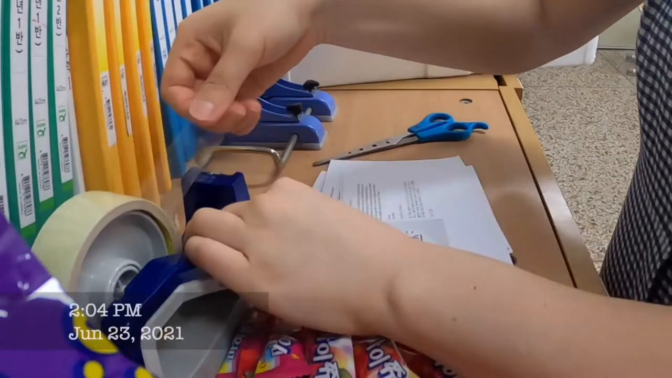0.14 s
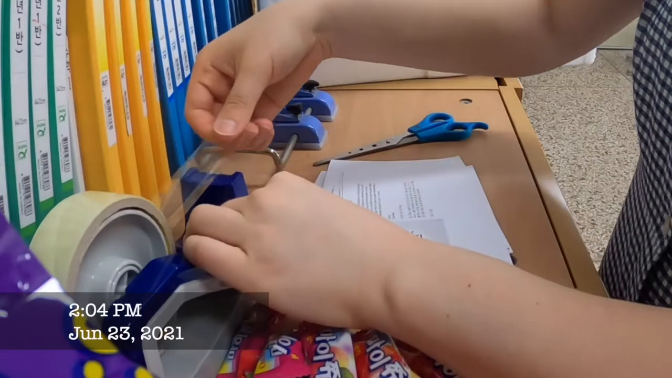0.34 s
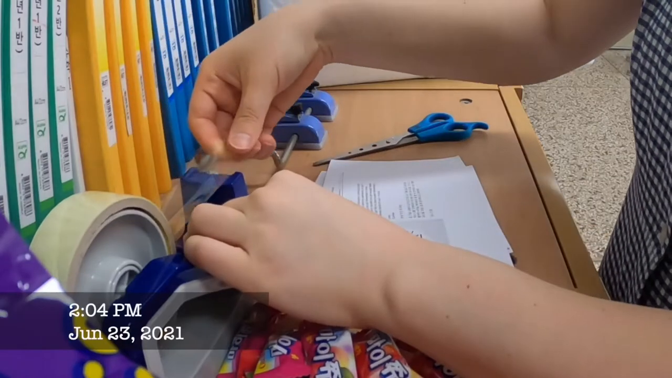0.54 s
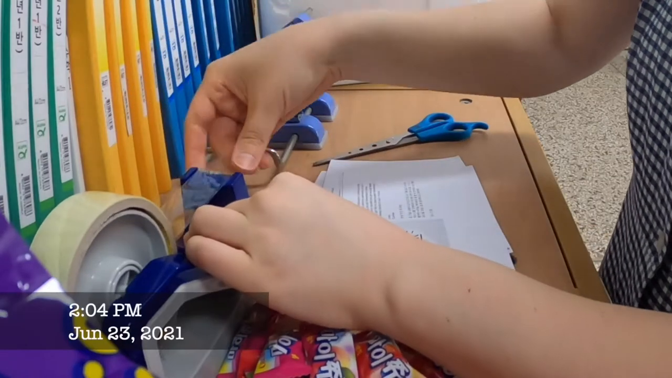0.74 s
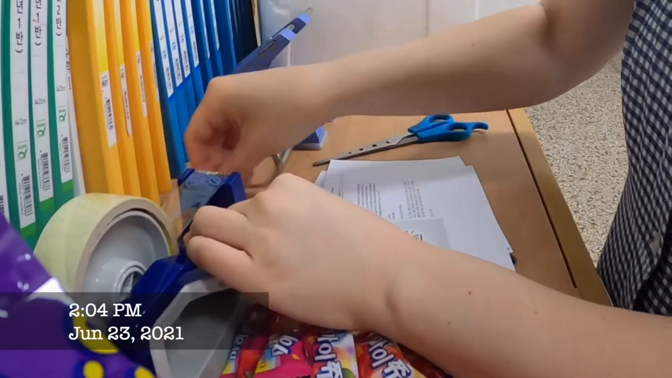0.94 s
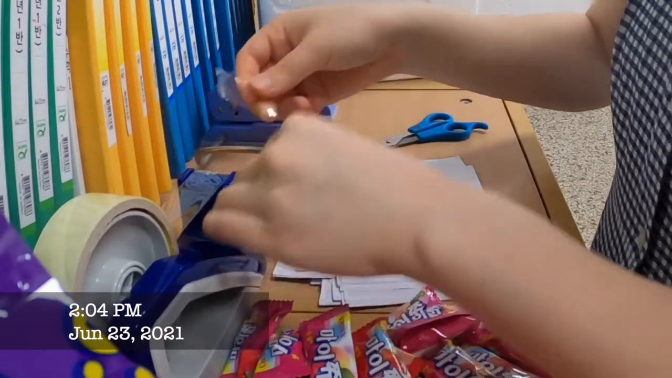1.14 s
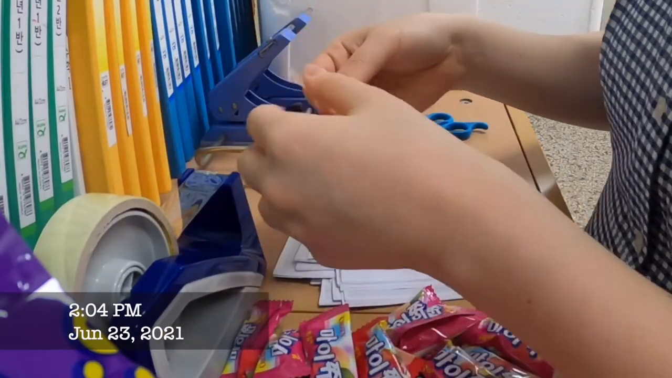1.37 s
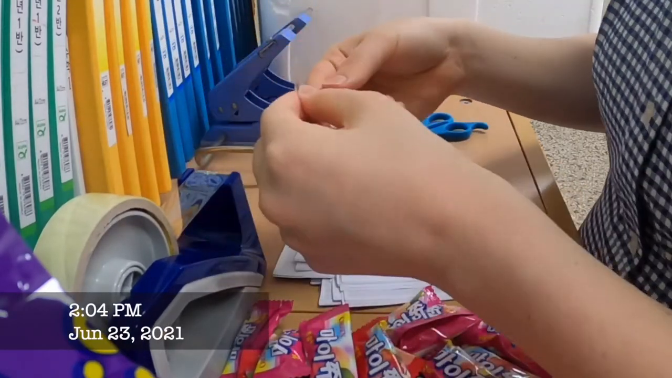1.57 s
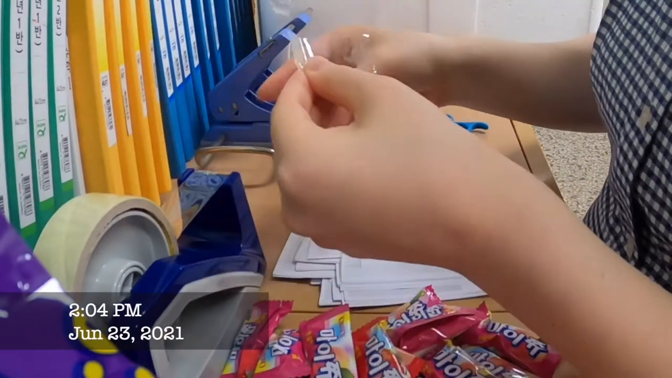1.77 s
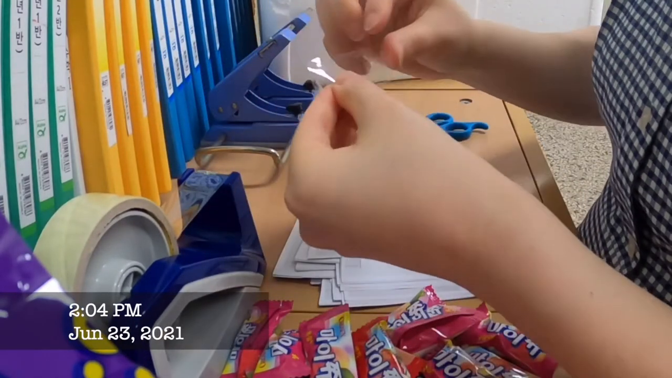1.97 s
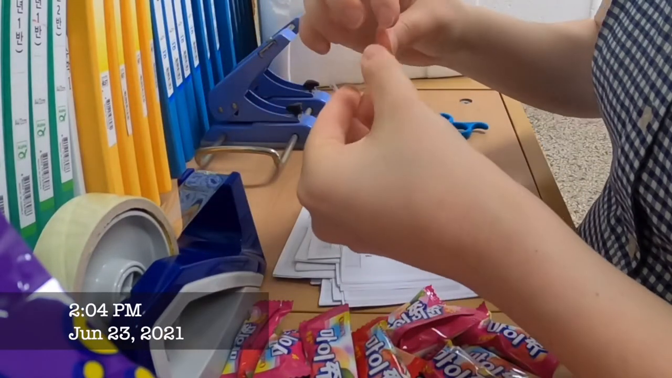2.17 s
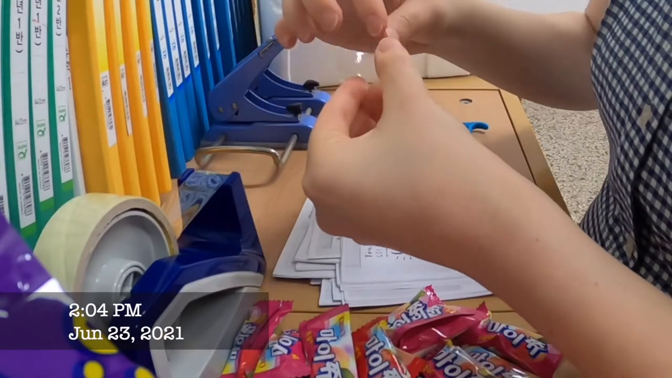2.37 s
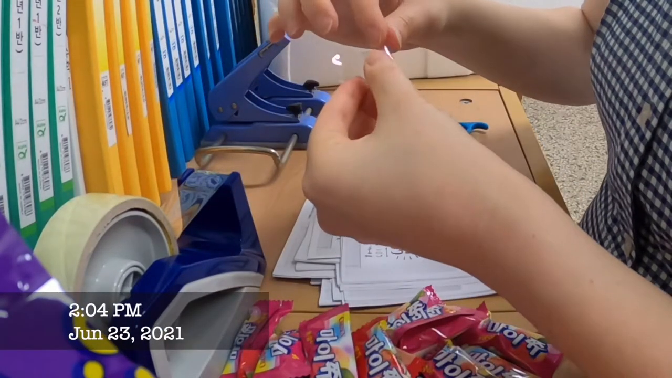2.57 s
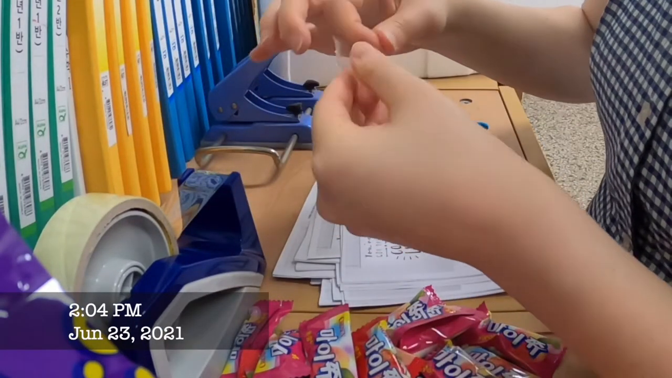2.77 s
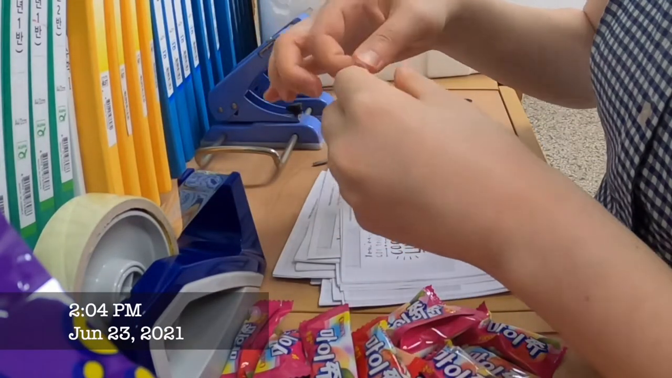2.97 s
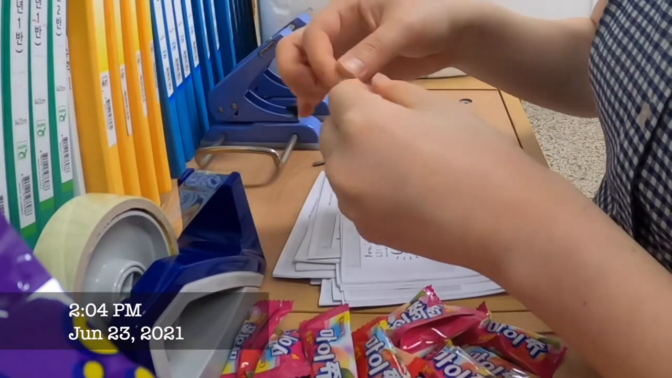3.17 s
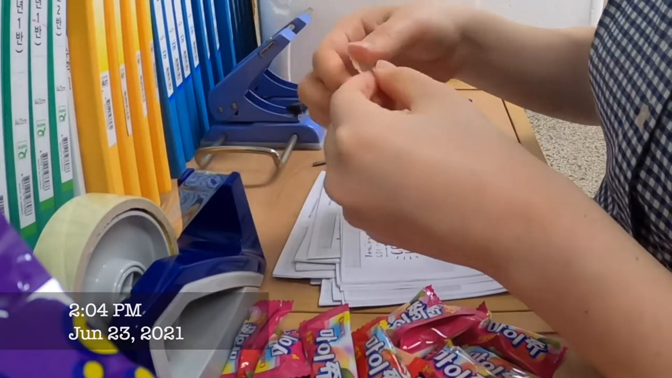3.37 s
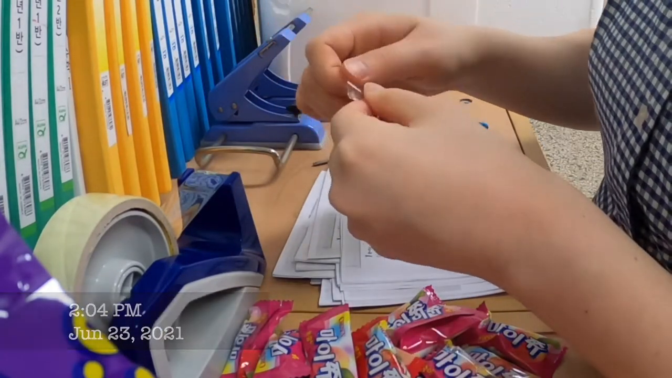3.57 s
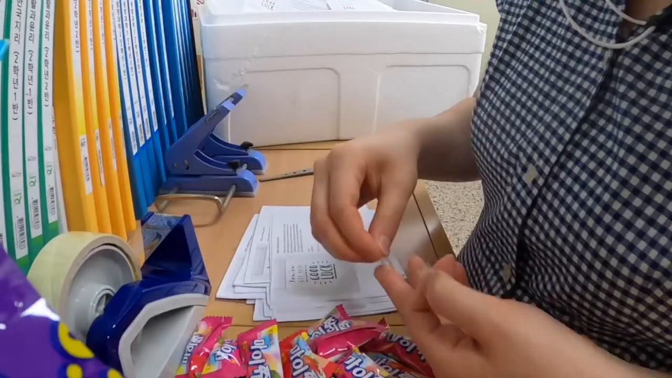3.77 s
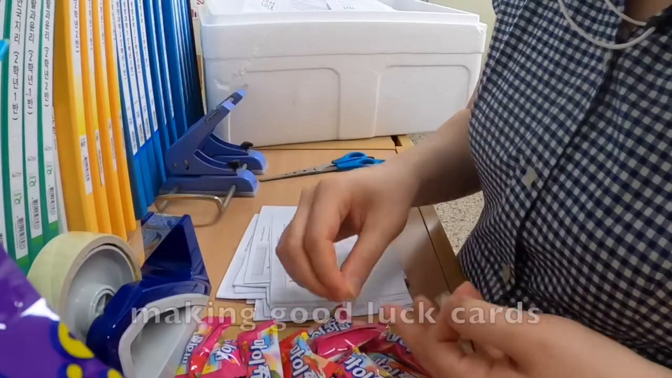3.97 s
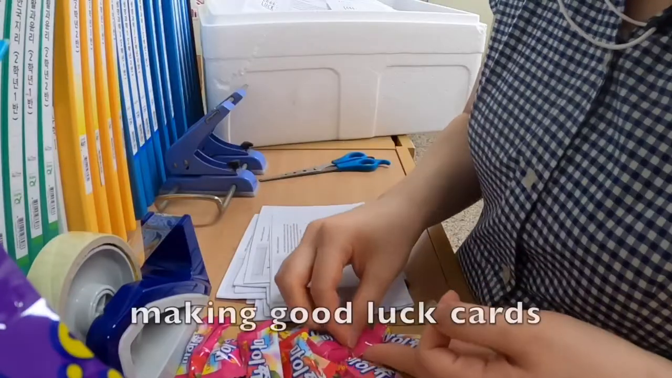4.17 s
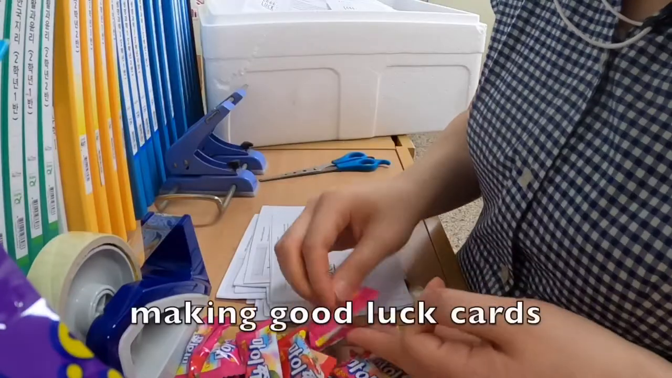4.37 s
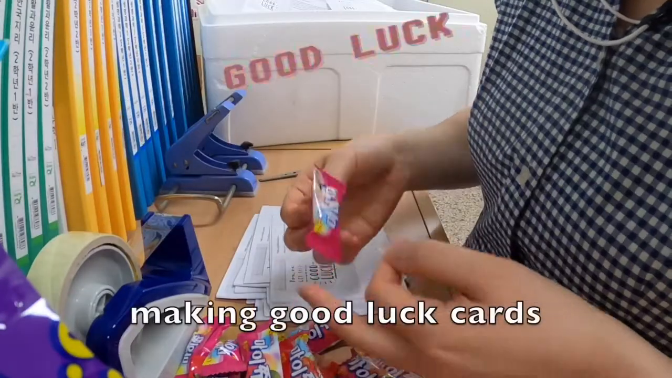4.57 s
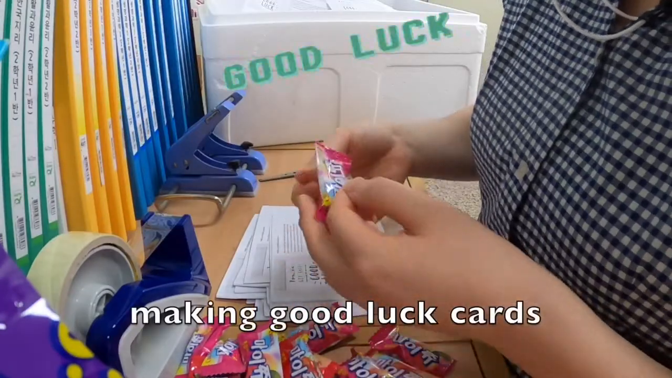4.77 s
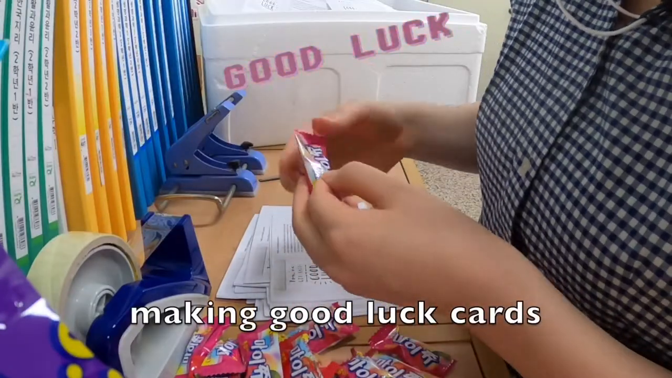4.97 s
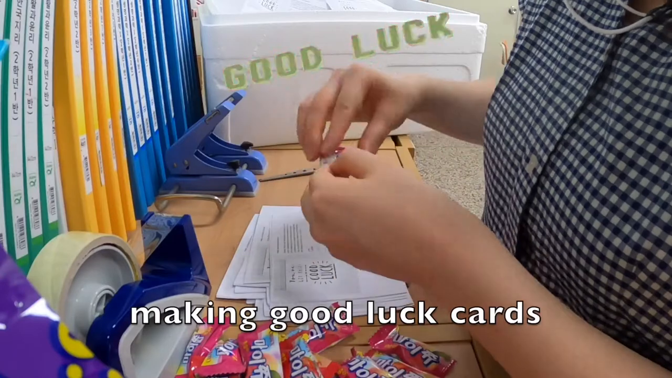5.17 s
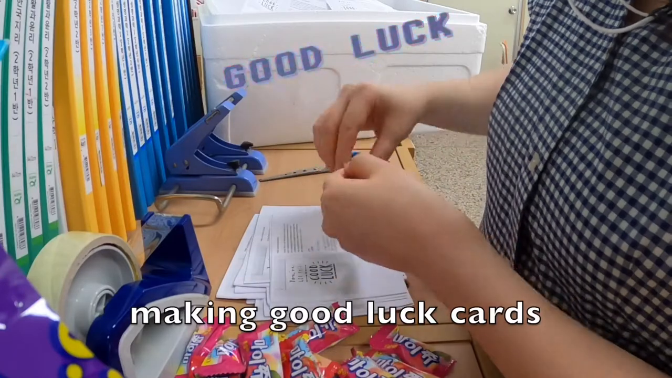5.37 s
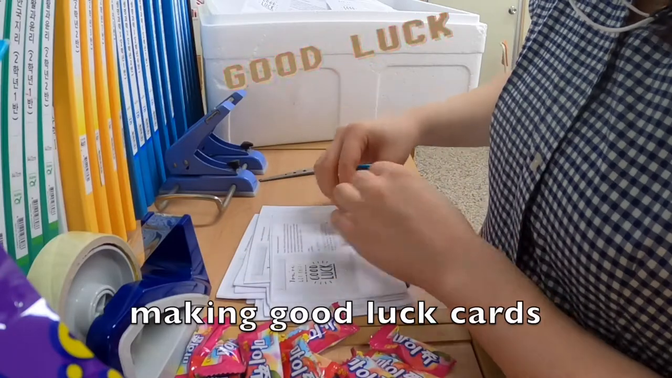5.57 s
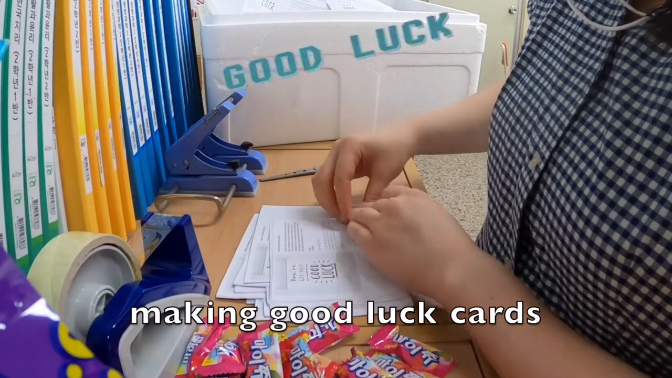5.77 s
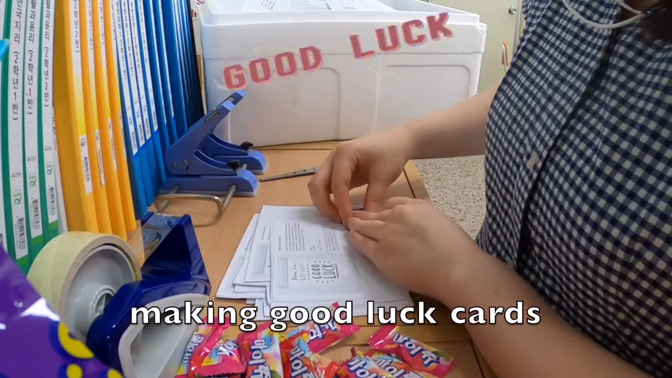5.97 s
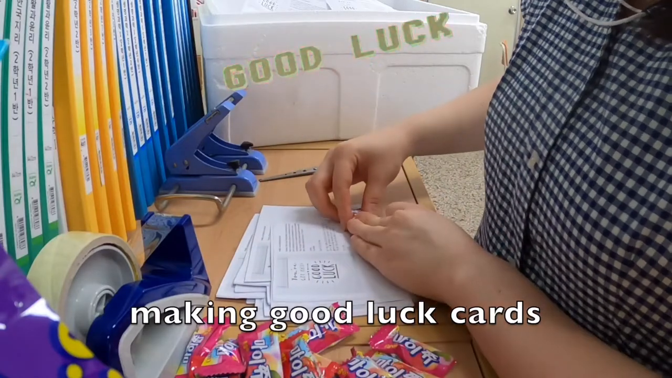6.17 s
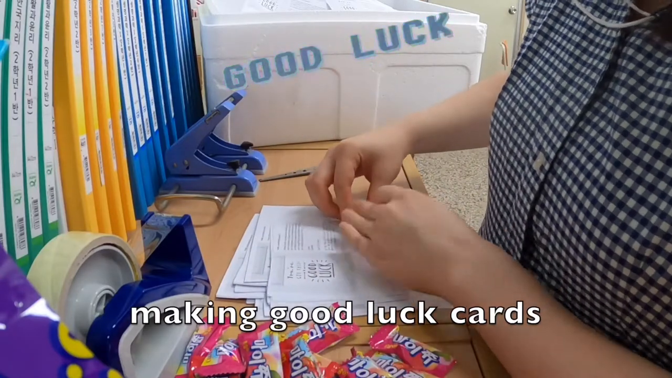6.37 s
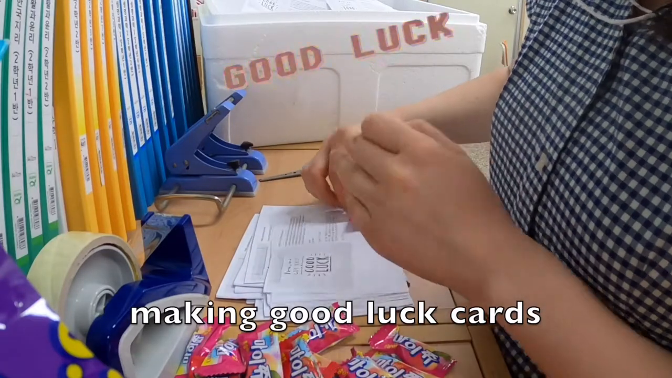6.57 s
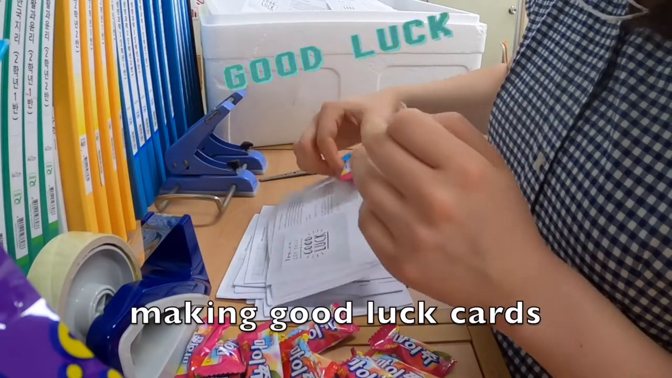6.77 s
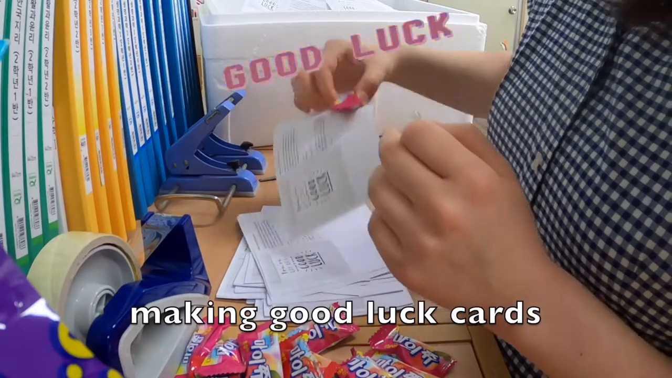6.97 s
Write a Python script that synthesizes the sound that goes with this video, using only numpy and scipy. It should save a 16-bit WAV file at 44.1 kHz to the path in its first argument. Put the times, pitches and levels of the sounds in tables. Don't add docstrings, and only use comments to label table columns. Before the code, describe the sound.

A small office with steady, bass-heavy ventilation hum, heard closely in stereo with a short room tail. From 0 to 0.4 seconds sticky tape is pulled from a desk dispenser: sharp glue snaps, a fast ratcheting rip around 0.16 to 0.28 that slows slightly, and hollow low thumps and plastic rattles as the dispenser jolts. Near 0.7 to 0.85 come small ticks and light knocks, then at 0.94 a loud snap and hollow thump as the tape tears. Mostly hum follows, with delicate clicks at 1.5 to 1.75 and sparse faint ticks and soft skin rubs until 3.7. At 4.1 a sweet wrapper is grabbed in a dense bright crackle, thinning by 4.8. Lighter crinkles come at 5.2 to 5.45, crisper ones around 5.8, then pressing crackles at 6.0 and 6.4, a few last ticks near 6.7 and a soft stroke on card at 6.9.

```python
import sys
import numpy as np
from scipy import signal
from scipy.fft import rfft, irfft
from scipy.io import wavfile
from scipy.ndimage import uniform_filter1d

SR = 44100
rng = np.random.default_rng(int(sys.argv[2]) if len(sys.argv) > 2 else 0)


def int16_out(signal):
    q = np.round(np.clip(np.atleast_2d(signal).T, -1, 1) * 32767)
    wavfile.write(sys.argv[1], SR, q.astype(np.int16))


def linear_from_db(decibels):
    return 10 ** (np.asarray(decibels, float) / 20)


N = 309582
TIME_S = np.arange(N) / SR
HZ = np.fft.rfftfreq(N, 1 / SR)

# frequency [Hz], level [dB per Hz].
OFFICE_SPECTRUM = [(12, -51.5), (20, -17.5), (48, -8), (113, -3), (146, -11.5), (187, -8.5), (285, -19.5),
                   (472, -22.5), (624, -30), (678, -28), (1090, -28), (2080, -39), (4420, -52.5),
                   (4810, -44.5), (16000, -77)]
OFFICE_DB = -52
# centre frequency [Hz], width [Hz], level [dB].
HUM_AND_HISS = [(58, 3.3, -60), (119.5, 10, -63), (172, 14, -72), (415.3, 7.1, -78.5), (4800, 60, -93.5),
                (7000, 4700, -85.5)]
# frequency [Hz], gain [dB].
ROOM_COLOUR = [(100, -0.5), (400, -6.5), (1500, -4), (5000, -0.5), (9000, -5), (16000, -15)]
ROOM_T60_S, ROOM_DB = 0.36, -10.5

# frequency [Hz], level [dB per Hz].
FILM_SPECTRUM = [(160, -46), (280, -14), (592, -7.5), (764, -13), (936, -2), (1290, -1), (1670, -2.5),
                 (3300, -3), (7980, -11), (12000, -27.5), (16300, -36.5)]
# start [s], hold [s], level [dB], treble [dB].
TAPE_MOVES = [(.0, 0.058, -54, -7), (.158, 0.043, -33, -2), (.178, 0.087, -30.5, -0.5),
              (.69, 0.053, -59.5, -3.5), (.865, 0.044, -59, -8.5), (.938, 0.0073, -34.5, -10.5),
              (.99, 0.15, -61.5, -4), (1.52, 0.14, -66.5, -7), (1.64, 0.066, -60.5, 4),
              (1.73, 0.0054, -48.5, -0.5), (2.1, 0.01, -76, -6.5), (2.275, 0.013, -70, 1.5),
              (2.35, 0.014, -70.5, 6), (2.62, .13, -67, -2.5), (2.93, 0.096, -68, -7),
              (3.19, 0.094, -71, 8), (3.345, 0.14, -68, -6), (3.55, 0.091, -64.5, -19),
              (3.65, 0.026, -59, -10)]
# start [s], hold [s], level [dB], treble [dB].
WRAPPER_MOVES = [(4.12, 0.011, -48, -7), (4.133, 0.058, -38, -3.5), (4.2, 0.021, -50, -4),
                 (4.275, 0.074, -45.5, -6.5), (4.37, 0.054, -50.5, -5), (4.44, 0.056, -48, -9.5),
                 (4.565, 0.1, -57.5, -2.5), (4.758, 0.0093, -54.5, 0.8), (4.96, 0.061, -60.5, -4),
                 (5.02, 0.0081, -52, -2), (5.19, 0.087, -59, -3), (5.33, 0.13, -56.5, 1),
                 (5.715, 0.019, -56, -18), (5.785, 0.087, -51.5, -4.5), (6.0, .03, -51.5, -2),
                 (6.06, 0.34, -60.5, -13), (6.43, 0.075, -55, -3.5), (6.7, 0.1, -68, 1.5),
                 (6.89, 0.071, -59.5, -3)]
# release [s], settling [dB], settling time [s per neper], idle fingers [dB].
TAPE_FEEL = (0.0106, -15.5, 0.11, -76.5)
WRAPPER_FEEL = (0.0272, -22, 0.02, -66.5)
GRAB_S, ATTACK_S = 4.1, .004

# start [s], peak [dB], pitch [Hz], T60 [s], shell knock [dB].
JOLTS = [(.011, -33, 161, 0.16, -15), (0.07, -21, 153, 0.087, -8.5), (0.096, -31, 174, 0.089, 11),
         (.1905, -15, 169.7, 0.07, -22), (0.2183, -22, 195, .3, -10.5), (.282, -20.5, 173, 0.076, -17),
         (0.366, -15, 154.7, 0.068, -10), (0.732, -40.5, 144, 0.041, -4), (0.851, -47.5, 148, 0.22, -13),
         (0.94, -10, 179, 0.067, -4), (.9525, -36, 190, .03, -20), (0.9557, -20.5, 191.7, 0.13, -36),
         (4.989, -47, 364, 0.046, -22)]
# pitch ratio, level [dB], share of the jolt's T60.
BODY_MODES = [(1, 6, 1.1), (0.65, -19.5, 0.43), (1.27, -3.5, 1.2), (2.2, -3, 0.36), (1.5, 2, .45)]
# frequency [Hz], level [dB], T60 [s].
SHELL_MODES = [(737, -2, 0.04), (1140, -4, 0.015), (593, -3, 0.021), (970, -15, 0.0093), (1330, -5, 0.0062)]
# time [s], drumming [dB], rattle [dB over drumming].
ROLL_TURNING = [
    (.12, -46, -8),
    (.14, -34, 2),
    (.165, -28, -1),
    (.195, -27, .5),
    (.215, -26.5, -2),
    (.235, -25.5, -4),
    (.265, -28, -6),
    (.29, -33.5, -17),
]

# time [s], level [dB], strongest pitch [Hz], second pitch [Hz], treble [dB].
GLUE_SNAPS = [(0.0658, -21.0, 6310, 4610, -16), (0.0755, -43.0, 5750, 3190, -18),
              (0.0951, -24.5, 5810, 2670, -14), (0.1044, -40.0, 5710, 2370, -18),
              (0.1303, -22.5, 2650, 5770, -12), (0.1436, -23.0, 3940, 7620, -11),
              (0.154, -27.0, 7750, 1890, -12), (0.2723, -24.0, 4070, 2840, -15),
              (0.2901, -52.0, 6330, 4330, -4), (0.2979, -50.0, 3080, 6850, -16),
              (0.3028, -45.5, 2990, 1160, -7), (0.3282, -54.0, 2860, 3920, -9),
              (0.342, -47.5, 4440, 2650, -19), (0.3692, -39.5, 1340, 3010, -24),
              (0.7043, -53.5, 5880, 4050, -14), (0.7307, -38.0, 5250, 2690, -17),
              (0.8345, -55.0, 2560, 6520, -12), (0.8635, -58.5, 2350, 1700, -36),
              (0.8979, -55.0, 3920, 5470, -12), (0.925, -41.5, 1230, 3960, -13),
              (0.9357, -31.5, 2300, 1340, -18), (0.9399, -29.5, 1420, 2430, -20),
              (0.9441, -31.0, 2150, 1160, -27), (0.9477, -35.5, 2020, 1290, -27),
              (0.9514, -42.0, 3140, 1270, -21), (1.0828, -53.5, 1180, 1640, -25)]
FOLD_SNAPS = [(1.5121, -54.0, 1230, 2500, -21), (1.5376, -48.5, 2990, 1530, -18),
              (1.5734, -52.0, 2950, 1790, -12), (1.5978, -61.0, 1640, 1180, -27),
              (1.6016, -59.0, 1400, 1920, -30), (1.6582, -53.5, 1790, 4200, -13),
              (1.6701, -35.5, 4110, 1350, -6), (1.6954, -56.0, 7390, 3010, -6),
              (1.7317, -41, 3300, 6500, -9), (1.7339, -35.0, 5860, 8480, -5),
              (2.1078, -55.0, 2800, 7640, -8), (2.2816, -57.0, 2800, 1570, -16),
              (2.6056, -55.0, 6930, 5060, -8), (2.6533, -59.5, 2990, 1180, -32),
              (2.8375, -45.0, 1610, 2730, -26), (2.9273, -56.5, 3080, 5710, -17),
              (2.9536, -57.5, 1160, 3290, -16), (3.0188, -65.0, 1340, 1830, -33),
              (3.235, -46.5, 3450, 5020, -11), (3.243, -44.5, 4650, 2840, -12),
              (3.2527, -53.0, 3450, 4840, -24), (3.262, -48.5, 1290, 1770, -20),
              (3.3529, -57.5, 1720, 1210, -26), (3.3638, -54.5, 1740, 1180, -23),
              (3.3825, -58.0, 1440, 2130, -29), (3.4035, -59.0, 1250, 1870, -24),
              (3.4203, -59.0, 1790, 1140, -24), (3.4849, -66.0, 1530, 1100, -10),
              (3.49, -53.5, 4370, 2280, -11), (3.6949, -56.5, 7750, 5660, -2)]
GRAB_SNAPS = [(4.1078, -51.5, 1920, 7710, -14), (4.1342, -33.0, 5750, 3080, -15),
              (4.1384, -28.0, 4290, 1790, -27), (4.1479, -31.0, 5060, 7210, -14),
              (4.1549, -43.0, 2070, 3830, -16), (4.1577, -47.0, 4670, 2990, -15),
              (4.1602, -33.0, 2710, 1810, -20), (4.1648, -27.0, 2910, 1590, -13),
              (4.1674, -33.5, 1960, 4370, -19), (4.1708, -39.0, 3250, 4800, -19),
              (4.1761, -43.0, 3190, 1680, -5), (4.179, -34.0, 2910, 4050, -16),
              (4.1886, -27.0, 3320, 1980, -17), (4.1983, -35.5, 1790, 2540, -14),
              (4.2035, -49.5, 3230, 1530, -17), (4.2177, -40.0, 2200, 4050, -17),
              (4.2203, -40.0, 1680, 2780, -16), (4.225, -36.5, 2090, 4930, -7),
              (4.2726, -45.5, 2760, 1830, -12), (4.2795, -43.5, 4910, 2050, -7),
              (4.2843, -40.0, 4870, 3230, -12), (4.2942, -34.5, 4290, 2020, -15),
              (4.3034, -39.0, 2840, 4840, -15), (4.3079, -41.5, 1960, 2860, -27),
              (4.3114, -44.5, 4800, 1770, -14), (4.3176, -47.0, 3290, 4870, -15),
              (4.3295, -35.0, 3360, 2240, -23), (4.3358, -34.5, 5790, 2800, -11),
              (4.3444, -41.5, 2410, 4890, -19), (4.3496, -44.5, 4220, 1920, -16),
              (4.3542, -42.0, 3570, 1720, -27), (4.3587, -46.5, 4090, 1660, -4),
              (4.3656, -42.0, 2300, 4570, -11), (4.3829, -50.5, 4890, 1530, -11),
              (4.3944, -43.5, 4540, 2240, -21), (4.4095, -39.5, 7600, 4720, -11)]
LIFT_SNAPS = [(4.4279, -44.5, 3400, 2330, -23), (4.4373, -40.0, 3450, 2240, -16),
              (4.4528, -46.0, 4720, 3270, -17), (4.4595, -41.5, 1680, 5810, -16),
              (4.4694, -51.0, 2910, 1270, -12), (4.4933, -45.0, 6420, 3570, -7),
              (4.5032, -38.0, 3450, 1250, -22), (4.5193, -49.0, 2780, 1590, -17),
              (4.5573, -38.5, 4970, 3490, -20), (4.5654, -34.0, 4130, 2260, -18),
              (4.5764, -47.5, 3680, 5060, -7), (4.6052, -60.0, 3060, 4200, -16),
              (4.6126, -46.0, 2910, 4780, -11), (4.6174, -38.0, 4970, 2890, -18),
              (4.6277, -54.5, 2540, 5150, -15), (4.6441, -52.0, 3190, 2330, -14),
              (4.6508, -41.5, 9430, 5620, 1), (4.7572, -38.5, 7750, 3660, -5),
              (4.7628, -46.5, 2730, 5280, -16), (4.7738, -44.5, 5640, 3040, -15),
              (4.9053, -52.0, 5120, 2150, -8), (4.9165, -60.5, 2670, 4070, -23),
              (4.9579, -60.5, 2170, 1570, -16), (4.9705, -57.5, 2220, 1610, -14),
              (4.9766, -52.0, 4460, 1610, -12), (5.0371, -47.5, 7210, 2350, -4)]
STICK_SNAPS = [(5.2014, -58.0, 5020, 2840, -8), (5.2434, -49.0, 2820, 7040, -7),
               (5.3233, -46.5, 4390, 2760, -11), (5.3396, -53.0, 5470, 1140, -27),
               (5.3453, -51.0, 1230, 5320, -15), (5.3717, -45.0, 3340, 5060, -5),
               (5.3805, -39.0, 2800, 1850, -31), (5.3995, -42.0, 4590, 2690, -4),
               (5.4182, -45.0, 6010, 3380, -5), (5.4229, -45.5, 4820, 7320, -9),
               (5.4418, -39.5, 3340, 5080, -5), (5.558, -53.5, 1890, 1100, -21),
               (5.6299, -52.5, 2390, 3600, -29), (5.7078, -49.5, 4090, 2930, -6),
               (5.7185, -47.0, 2200, 3400, -9), (5.7389, -49.5, 1210, 4590, -15),
               (5.7672, -51.0, 4410, 1790, -20), (5.7721, -50.5, 4820, 1080, -34),
               (5.7771, -52.5, 3230, 4930, -17), (5.7894, -36.0, 4540, 2840, -13),
               (5.7925, -39.0, 2860, 4160, -14), (5.8298, -53.5, 3290, 4610, -14),
               (5.8356, -36.5, 3550, 7300, -8), (5.8575, -34.5, 6010, 4390, -7),
               (5.8654, -46.5, 4910, 2130, -7), (5.8745, -53.5, 5360, 3420, -15),
               (5.9149, -50.5, 2820, 5000, -15), (5.9319, -56.5, 2840, 2070, -14)]
PRESS_SNAPS = [(5.9722, -52.0, 4780, 2110, -12), (5.9912, -48.0, 3570, 5040, -20),
               (5.994, -51.5, 2930, 4350, -10), (6.0135, -42.0, 4290, 2890, -20),
               (6.0208, -37.5, 1770, 4110, -5), (6.0344, -50.5, 2970, 2170, -9),
               (6.0703, -56.0, 1100, 2130, -33), (6.0843, -57.0, 1140, 2760, -16),
               (6.128, -53.0, 4800, 2800, -8), (6.1451, -44.5, 1940, 1160, -8),
               (6.3717, -55.0, 1120, 2220, -7), (6.3821, -46.0, 2220, 3400, -6),
               (6.3958, -47.0, 2170, 3360, -21), (6.3998, -37.0, 1160, 3360, -9),
               (6.4119, -53.0, 5940, 1380, -7), (6.4229, -46.0, 4220, 7210, -15),
               (6.4337, -50.0, 3620, 2200, -13), (6.4426, -39.5, 4220, 7260, -8),
               (6.4487, -53.5, 5640, 3190, -15), (6.4528, -52.5, 4130, 2150, -10),
               (6.4751, -46.5, 2730, 4130, -13), (6.4832, -49.0, 4010, 5730, -5),
               (6.502, -38.5, 2150, 5600, -15), (6.5187, -56.0, 4390, 2330, -15),
               (6.5256, -57.0, 5560, 1660, -11), (6.6884, -46.5, 1160, 7210, -14),
               (6.7206, -54.0, 1160, 7260, -17), (6.7512, -43.0, 3490, 5710, -4)]
SNAP_BASS_DB = (-13.5, -13, -12, -17.5, -17, -16.5, -17)
BASS_DB_PER_OCTAVE = -2.5
SNAP_S, TREBLE_HZ = .004, 8000

SLIPS, SLIP_START_S, SLIP_PERIOD_S, SLIP_GROWTH_S = 22, .1615, .0039, .000104
SLIP_DB = (-26.5, -30)

# start [s], end [s], level [dB], centre [Hz], width [Hz].
STROKES = [
    (2.623, 2.766, -70, 2930, 1300),
    (2.894, 3.0, -71.5, 3150, 900),
    (3.331, 3.498, -60.5, 1560, 1750),
    (3.76, 3.87, -74.5, 9100, 900),
    (6.865, 7.06, -66.5, 4650, 1510),
]


def level(x, db):
    return x * linear_from_db(db) / np.sqrt(np.mean(x ** 2))


def tint(points, hz):
    point_hz, point_db = np.array(points).T
    return np.interp(np.log(np.maximum(hz, 1)), np.log(point_hz), point_db)


def curve(rows):
    s, *columns = np.transpose(rows)
    return [np.interp(TIME_S, s, c) for c in columns]


def walk(rate_hz):
    k = int(SR / rate_hz)
    held = np.repeat(rng.standard_normal(N // k + 1), k)
    return uniform_filter1d(uniform_filter1d(held, k), k)[:N]


def ring(hz, db, t60_s, phase, size):
    t = np.arange(size) / SR
    hz, db, t60_s, phase = (np.reshape(v, (-1, 1)) for v in (hz, db, t60_s, phase))
    decay = np.exp(-np.log(1000) * t / np.abs(t60_s))
    return np.sum(linear_from_db(db) * decay * np.sin(2 * np.pi * hz * t + phase), axis=0)


def resonant_noise(hz, width_hz, db):
    spectrum = rfft(rng.standard_normal(N)) / (1 + ((HZ - hz) / width_hz) ** 2 * 4)
    return level(irfft(spectrum, N), db)


def add(out, s, sound):
    i = max(int(s * SR), 0)
    out[:, i:i + sound.shape[-1]] += sound[..., :N - i]


def ports(mid, side, hz):
    return mid + .26 * (hz / 6000) ** .8 * np.array([[-1], [1]]) * side


def office():
    colour, out = linear_from_db(tint(OFFICE_SPECTRUM, HZ)), 0
    for hz in 28 * 2 ** np.arange(10):
        octaves_off = np.abs(np.log2(np.maximum(HZ, 1) / hz))
        band = colour * np.clip(1 - octaves_off, 0, 1) ** .5
        mid, side = irfft(rfft(rng.standard_normal((2, N))) * band, N)
        spread = np.clip(0.2 + 6.0 / hz + hz / 9000, 0, 1)
        out = out + linear_from_db(1.0 * walk(2.5)) * (mid + spread * side * np.array([[1], [-1]]))
    out = level(out, OFFICE_DB - 3.5)
    for hz, width_hz, db in HUM_AND_HISS:
        out = out + resonant_noise(hz, width_hz, db) * linear_from_db(2.2 * walk(4))
    return out


def handling():
    t = np.arange(0, N + 64, 64) / SR
    power = linear_from_db(2 * np.where(t < GRAB_S, TAPE_FEEL[-1], WRAPPER_FEEL[-1]))
    treble = -5.0 * power
    for moves, feel in ((TAPE_MOVES, TAPE_FEEL), (WRAPPER_MOVES, WRAPPER_FEEL)):
        release_s, settle_db, settle_s, _ = feel
        start, hold, db, treble_db = np.transpose(moves)[..., None]
        after = np.maximum(t - start - hold, 0)
        rise = np.exp(np.minimum(t - start, 0) / ATTACK_S)
        fall = np.exp(-after / release_s) + linear_from_db(settle_db) * np.exp(-after / settle_s)
        move_power = (linear_from_db(db) * rise * fall) ** 2
        power = power + np.sum(move_power, axis=0)
        treble = treble + np.sum(treble_db * move_power, axis=0)
    return [np.interp(TIME_S, t, v) for v in (10 * np.log10(power), treble / power)]


def crackle(rate_hz=650, spread_db=4.0, rub=0.42):
    db, treble_db = handling()
    out, fade, film = 0, np.exp(-np.arange(300) / SR / .0012), linear_from_db(tint(FILM_SPECTRUM, HZ))
    shared_db = 4.5 + spread_db * np.minimum(rng.exponential(size=N), 4.0)
    shared = (rng.random(N) < .3 * rate_hz / SR) * linear_from_db(shared_db)
    # low Hz, high Hz, tilt, lift dB
    bands = ((300, 2000, -0.19, -2.0), (2000, 4500, 0.18, -2.5),
             (4500, 9000, 0.92, 0.54), (9000, 17000, 0.93, -0.35))
    for low_hz, high_hz, tilt, lift_db in bands:
        bright = low_hz > 4000
        grain_db = spread_db * np.minimum(rng.exponential(size=N), 4.5) + 4.5 * walk(60)
        grains = shared + (rng.random(N) < rate_hz / SR) * linear_from_db(grain_db)
        creases = level(signal.fftconvolve(grains, fade)[:N], 0)
        shape = level(creases + rub, -2.5) * linear_from_db(db + lift_db + tilt * treble_db)
        band = film / np.sqrt((1 + (low_hz / (HZ + 1)) ** 6) * (1 + (HZ / high_hz) ** 6))
        band = band / np.sqrt(np.mean(film ** 2 * ((HZ > 4500) == bright)))
        out = out + band * ports(*rfft(rng.standard_normal((2, N)) * shape), HZ)
    return irfft(out, N)


def dispenser(peel):
    out = np.zeros((1, N))
    ratio, body_db, share = np.transpose(BODY_MODES)
    shell = ring(*np.transpose(SHELL_MODES), 0, size=3000)
    shell = shell / np.abs(shell).max()
    swell = 1 - np.exp(-(np.arange(9000) / SR / 0.0026) ** 2)
    for s, db, hz, t60_s, knock_db in JOLTS:
        body = swell * ring(hz * ratio, body_db, t60_s * share, 3.0 - 1.2 * (ratio - 1), size=9000)
        i = int(s * SR)
        out[:, i:] *= np.exp(-np.arange(N - i) / SR / .002)
        add(out, s, linear_from_db(db) * body[None] / np.abs(body).max())
        add(out, s, linear_from_db(db + knock_db) * shell[None])

    drum_db, rattle_db = curve(ROLL_TURNING)
    turning = np.interp(TIME_S, [.125, .15, .27, .285], [0, 1, 1, 0])
    fine_slips = (rng.random(N) < 2500 / SR) * rng.standard_normal(N)
    tugs = .12 * fine_slips
    tugs[((peel[:, 0] + .0004) * SR).astype(int)] += 3.0 * linear_from_db(peel[:, 1] - SLIP_DB[0])
    roll_body = ring(188 * ratio, 0.74 * body_db, 0.07 * share, 0, size=9000)
    drum = signal.fftconvolve(tugs, roll_body)[:N]
    rattle = signal.fftconvolve(fine_slips, shell)[:N]
    out = out + turning * linear_from_db(drum_db) * (level(drum, -17) + linear_from_db(rattle_db) * level(rattle, -1.4))
    out = signal.sosfilt(signal.butter(2, 85, "high", fs=SR, output="sos"), out)
    return out + .13 * np.roll(out, int(.0013 * SR), axis=1) * np.array([[1], [-1]])


def snaps(peel, size=2048):
    out, t, hz = np.zeros((2, N)), np.arange(size) / SR - .004, np.fft.rfftfreq(size, 1 / SR)
    tables = (peel, GLUE_SNAPS, FOLD_SNAPS, GRAB_SNAPS, LIFT_SNAPS, STICK_SNAPS, PRESS_SNAPS)
    rows = [(*row, bass_db) for table, bass_db in zip(tables, SNAP_BASS_DB) for row in table]
    fizz = np.exp(-t / .0015) + .08 * np.exp(-t / .005)
    shape = np.where(t > 0, fizz, np.exp(np.minimum(t, 0) / .0004))
    click = 4.5 * (np.arange(size) == np.argmax(t > 0)) * np.array([[1], [0]])
    top = 1 / (1 + (TREBLE_HZ / (hz + 1)) ** 10)
    film = linear_from_db(tint(FILM_SPECTRUM, hz) + 8.5 * np.clip(np.log2(hz / TREBLE_HZ + 1e-9), 0, 1))
    for s, db, crease_hz, second_hz, treble_db, bass_db in rows:
        noise = rng.standard_normal((2, size))
        bass_db = bass_db + BASS_DB_PER_OCTAVE * np.log2(min(crease_hz, second_hz) / 2500)
        bass = linear_from_db((bass_db + 12.5) * np.clip(np.log2(2600 / (hz + 1)), 0, 1))
        crease = 3.0 / (1 + 1j * (hz - crease_hz) / (.065 * crease_hz))
        second = 2.2 / (1 + 1j * (hz - second_hz) / (.07 * second_hz))
        source = noise * shape + click * np.sign(noise[1, 0])
        burst = ports(*rfft(source), hz) * film * bass * (1 + crease + second)
        low, high = irfft([burst * (1 - top), burst * top], size)
        low_gain = np.sqrt(max(1 - linear_from_db(2 * treble_db), .3))
        sound = level(low, db) * low_gain + level(high, db + treble_db)
        add(out, s - .004, sound * np.sqrt(SNAP_S * SR / size) * linear_from_db(.6))
    return out


def stick_slips():
    k, chance = np.arange(SLIPS), rng.standard_normal((5, SLIPS))
    s = SLIP_START_S + k * SLIP_PERIOD_S + k ** 2 * SLIP_GROWTH_S / 2 + .0003 * chance[0]
    db = np.interp(k, [0, SLIPS], SLIP_DB) + 1.8 * chance[1]
    crease_hz, second_hz = 5700 * 2 ** (.2 * chance[2]), 1900 * 2 ** (.6 * chance[3])
    treble_db = -11.5 + 2.5 * chance[4]
    return np.transpose([s, db, crease_hz, second_hz, treble_db])


def strokes():
    out = 0
    for start, end, db, hz, width_hz in STROKES:
        shape = np.interp(TIME_S, [start, start + 0.027, end], [0, 1.5, 0], 0, 0)
        out = out + resonant_noise(hz, width_hz, db) * shape * linear_from_db(3.4 * walk(45))
    return out


def room(x):
    t = np.arange(int(.9 * SR)) / SR
    decay = np.exp(-np.log(1000) * t / ROOM_T60_S) * np.clip(t / 0.0012 - .4, 0, 1)
    tail = rng.standard_normal((3, len(t))) * decay
    tail = tail[0] + .45 * tail[1:]
    tail = linear_from_db(ROOM_DB) * tail / np.sqrt(np.sum(tail ** 2) / 2)
    wet = signal.fftconvolve(x.mean(axis=0)[None], tail, axes=1)[:, :N]
    return irfft(rfft(wet) * linear_from_db(tint(ROOM_COLOUR, HZ)), N)


def hands_aside(near):
    left = rfft(near[0])
    delay = np.exp(-2j * np.pi * HZ * 1.58 / SR)
    aside = irfft(left * delay * linear_from_db(-1.5 * HZ / 8000), N)
    shaded = irfft(left * linear_from_db(-3.5 * (HZ / 13000) ** 2), N)
    moved = np.interp(TIME_S, [1.3, 1.4], [0, 1])
    return np.array([shaded + moved * (aside - shaded), near[1]])


def scene():
    peel = stick_slips()
    near = hands_aside(snaps(peel) + crackle() + strokes() + dispenser(peel))
    return near + room(near) + office()


def top_cut(x):
    return signal.sosfilt(signal.butter(12, 16510, fs=SR, output="sos"), x)


def record(dry):
    mix = irfft(rfft(dry) / (1 + (HZ / 16150) ** 60), N)
    return top_cut(mix)


dry = scene()
out = record(dry)
int16_out(out)
```